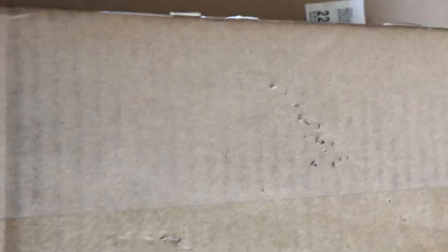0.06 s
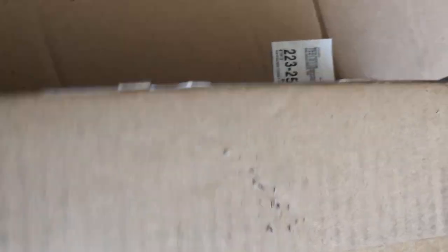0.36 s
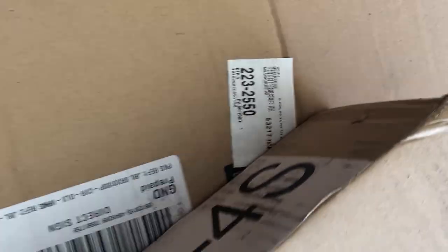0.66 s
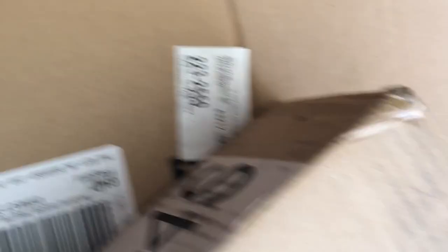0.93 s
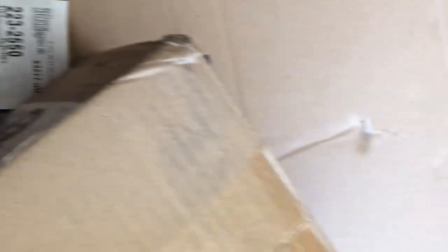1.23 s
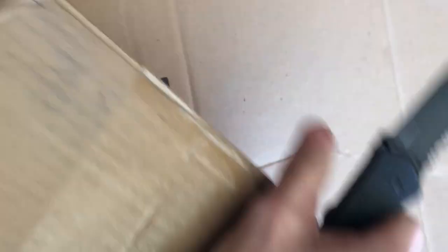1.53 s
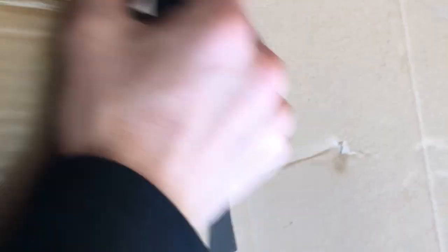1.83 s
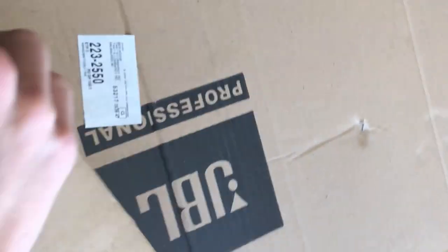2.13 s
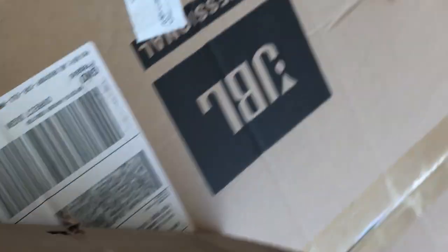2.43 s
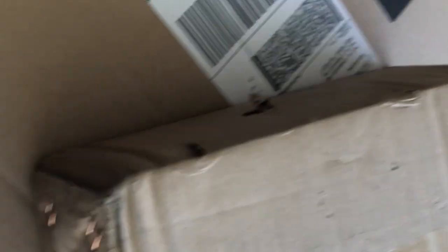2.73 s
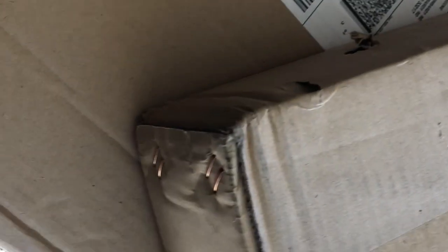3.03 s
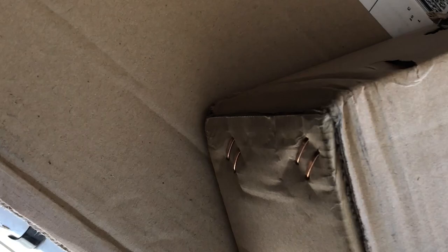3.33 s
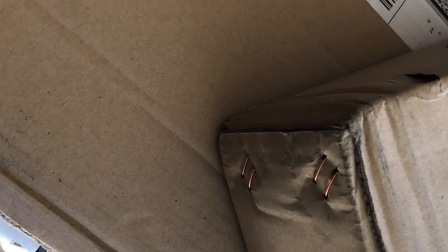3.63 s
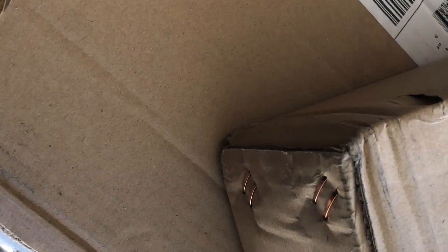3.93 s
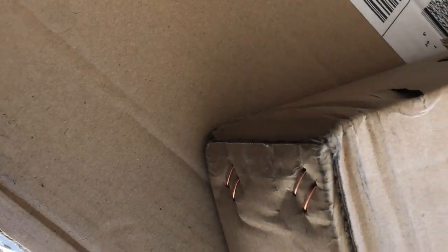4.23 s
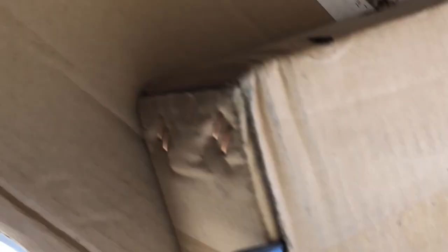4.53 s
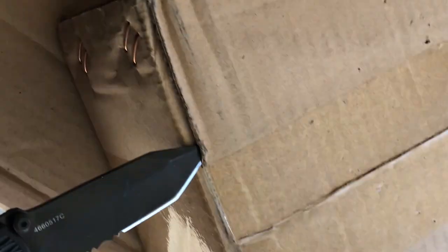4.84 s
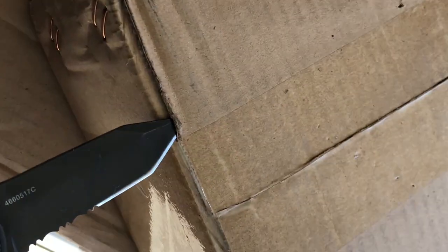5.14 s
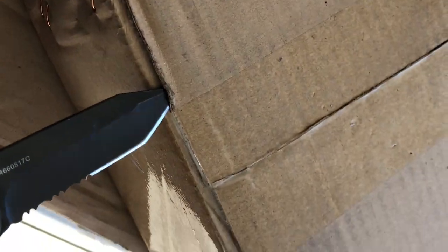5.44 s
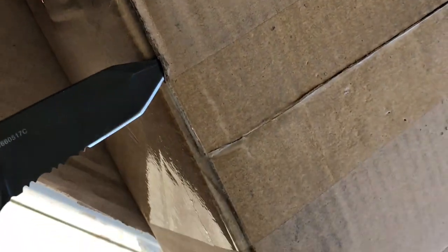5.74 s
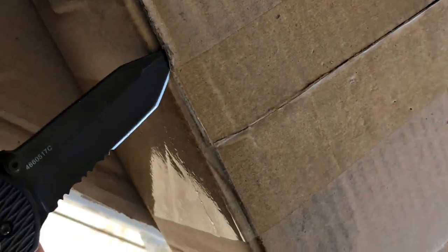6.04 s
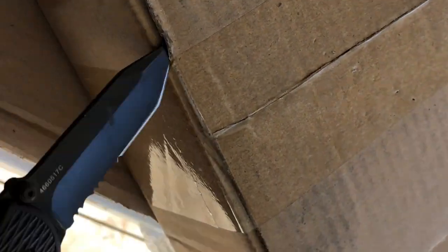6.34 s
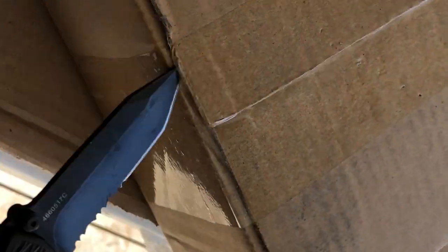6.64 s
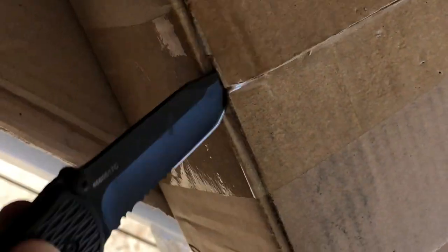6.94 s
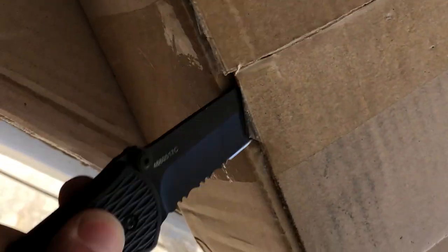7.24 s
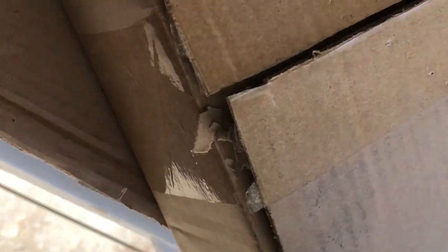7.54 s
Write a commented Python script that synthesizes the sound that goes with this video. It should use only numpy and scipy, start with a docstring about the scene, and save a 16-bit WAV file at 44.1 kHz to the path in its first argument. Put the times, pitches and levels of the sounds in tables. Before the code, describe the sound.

Close by in a small room, a carton slides along the inside of a big cardboard box with a rubbing hiss, hollow bumps and sharp ticks. The drag stops, leaving low room noise and faint birds outside. A knife tip scratches lightly at a taped seam, then tears through it in short rasping strokes with snapping fibres and cardboard thumps.

```python
"""Over low room noise, a carton slides along the wall of a big cardboard box, bumping and ticking.
Friction makes its hiss and rumble; impacts send bending waves through the board and set flaps ringing.
Then a knife tip picks at a taped seam and tears through it in short rasping strokes, with snapping
fibres and thumps of the panel. Faint birds chirp outside. The box is close by, indoors, heard in mono."""
import sys
import numpy as np
from scipy import signal
from scipy.fft import rfft, irfft, next_fast_len
from scipy.io import wavfile
from scipy.ndimage import map_coordinates

SR = 44100
rng = np.random.default_rng(int(sys.argv[2]) if len(sys.argv) > 2 else 0)


def file_out(sig):
    """Save sig as 16-bit WAV at sys.argv[1]."""
    # one column per channel
    cols = np.atleast_2d(sig).T
    # limit, then scale
    lim = np.clip(cols, -1, 1)
    pcm = np.round(lim * 32767).astype(np.int16)
    wavfile.write(sys.argv[1], SR, pcm)


N = 338688

# bumps on the panels: t/s, level/dB, pitch f/Hz
BUMPS = [(.23, -15.5, 488), (0.2537, -17.5, 494), (0.341, -29.5, 770), (0.36, -36, 895), (.47, -29, 266),
         (0.55, -27.5, 137), (0.744, -28, 229), (.857, -25.5, 600), (0.864, -19, 213), (0.964, -11, 280),
         (.988, -21, 700), (1.031, -21, 235), (1.1743, -29, 1070), (1.175, -25.5, 169), (1.19, -28.5, 148),
         (1.412, -22, 910), (1.515, -26.5, 830), (1.517, -21.5, 139.6), (1.621, -24.5, 170),
         (2.675, -36, 401), (2.679, -31.5, 1010), (2.719, -29, 1300), (3.9018, -33, 785),
         (3.902, -20.5, 178), (4.265, -38.5, 306), (4.288, -29.5, 360), (4.315, -32.5, 313),
         (4.78, -38.5, 173), (4.817, -41, 170), (6.382, -31, 1550), (6.537, -22.5, 316),
         (6.587, -22.5, 196), (6.96, -19.5, 304), (6.972, -11.5, 196), (7.181, -33, 180),
         (7.435, -18, 1010), (7.437, -19.5, 180), (7.483, -8.5, 209), (7.484, -18.5, 430),
         (7.503, -26, 170)]
# spectrum of board fibres catching and tearing: f/Hz, relative level/dB
RASP_SPECTRUM = [(250, -40.5), (620, 2), (1100, 0), (1650, 3), (2200, 2), (2800, -6), (4000, -19),
                 (7000, -44)]


def amp(db):
    """Amplitude ratio of a level in decibels."""
    return 10 ** (np.asarray(db) / 20)


def unit(x):
    """Normalisation to rms 1."""
    return x / np.sqrt(np.mean(x ** 2) + 1e-20)


def along(points, hz):
    """Interpolation of (f/Hz, value) points on a logarithmic frequency axis."""
    f, values = np.transpose(points)
    return np.interp(np.log(hz + 1e-6), np.log(f), values)


def curves(rows):
    """Linear interpolation in time: one value per sample for each column after t/s."""
    times, *columns = np.transpose(rows)
    return [np.interp(np.arange(N) / SR, times, column) for column in columns]


def wobble(rate):
    """Smooth random modulation: a spline through rate knots a second."""
    return map_coordinates(rng.standard_normal(int(N * rate / SR) + 4), [np.arange(N) * rate / SR])


def swell(s, rise, fall):
    """Gaussian envelope of a movement that speeds up until time s, then slows."""
    t = np.arange(N) / SR - s
    return np.exp(-(t / np.where(t < 0, rise, fall)) ** 2 / 2)


def press(start, end, rise, fall):
    """Smooth gate of a push that sets in at start, holds, and lets go at end."""
    t = np.arange(N) / SR
    return (1 + np.tanh((t - start) / rise)) / 2 * (1 - np.tanh((t - end) / fall)) / 2


def add(track, s, sound):
    """Superposition of a sound on the track at time s."""
    part = track[max(0, round(s * SR)):][:len(sound)]
    part += sound[:len(part)]


def filtered(x, response):
    """Linear filtering: the spectrum of x times a complex frequency response."""
    size = next_fast_len(len(x) + SR // 4)
    return irfft(rfft(x, size) * response(np.fft.rfftfreq(size, 1 / SR)), size)[:len(x)]


def coloured(x, spectrum):
    """Spectral shaping of x, returned at rms 1."""
    return unit(filtered(x, lambda hz: amp(along(spectrum, hz))))


def minimum_phase(spectrum, scale_hz, size=2048):
    """Minimum-phase impulse response of a spectrum whose frequencies count in units of scale_hz."""
    hz = np.fft.rfftfreq(size, 1 / SR)
    cepstrum = irfft(np.log(amp(along(spectrum, hz / scale_hz))))
    cepstrum[1:size // 2] *= 2
    cepstrum[size // 2 + 1:] = 0
    return irfft(np.exp(rfft(cepstrum)))


def resonance(f, centre_hz, width_hz):
    """Frequency response of a damped oscillator, 1 at its centre."""
    return 1j * f * width_hz / (centre_hz ** 2 - f * f + 1j * f * width_hz)


def bend(x, lag_s=0.00513, lag_hz=200, slope=0.773):
    """Dispersion of bending waves in the board: the treble arrives first, the bass last."""
    def response(hz):
        group_delay = lag_s * (lag_hz / np.maximum(hz, 100)) ** slope
        return np.exp(-2j * np.pi * np.cumsum(group_delay) * hz[1])
    return filtered(x, response)


def echoes(x, decay):
    """Reverberation: diffuse reflections die exponentially, with decay given as (f/Hz, t60/s) points."""
    hz, t, noise = signal.stft(rng.standard_normal(SR // 2), SR, nperseg=256)
    tail = signal.istft(noise * amp(-60 * t / along(decay, hz)[:, None]), SR, nperseg=256)[1]
    return signal.fftconvolve(x, tail / np.linalg.norm(tail))[:N]


def fibres(density, spread_db, clump_rate, clump_db):
    """Shot noise: tiny slips of random size, density a second, whose strength comes in clumps."""
    slips = (rng.random(N) < density / SR) * rng.choice([-1, 1], N)
    size_db = spread_db * np.clip(rng.standard_normal(N), -2, 2)
    return unit(slips * amp(size_db + clump_db * np.tanh(wobble(clump_rate))))


def room_noise():
    """Background noise: broadband, strongest in the bass and nearly steady."""
    # noise spectrum: f/Hz, relative level/dB
    spectrum = [(15, -52), (25, -20.5), (76, 1.5), (102, 0.5), (206, -4.5), (416, -16), (988, -14),
                (1740, -21), (2160, -28), (2760, -31), (3720, -30.5), (5430, -30), (7710, -38.5),
                (14800, -44.5), (16000, -43)]
    # a slight rise of the noise: t/s, level/dB
    trend = [(3.3, -49), (4.3, -48.5)]
    level_db, = curves(trend)
    return amp(level_db + 0.56 * wobble(4.65)) * coloured(rng.standard_normal(N), spectrum)


def carton_moves(sizzle_tilt=1.3):
    """Incoherent movements add in power, giving envelopes of rumble, rub, hiss and sizzle."""
    # short shoves: top speed t/s, rise/s, fall/s, level/dB, brightness/dB, wall rumble/dB
    shoves = [(.09, 0.038, 0.13, -47.5, -0.5, -58), (.485, 0.089, 0.11, -33.5, 2, -45),
              (.62, 0.1, 0.11, -35, 0, -41.5), (0.859, 0.049, 0.11, -37, -0.5, -41),
              (1.158, 0.029, 0.031, -49.5, 7.5, -58)]
    # the long drag, which stops dead: t/s, level/dB, brightness/dB, wall rumble/dB
    drag = [(1.02, -53, 8, -40), (1.27, -37.5, -1.5, -47), (1.45, -34.5, 0, -48), (1.7, -35, 2.5, -46),
            (1.97, -36.5, 1, -46.5), (2.27, -35, 3, -48.5), (2.58, -40.5, 0.5, -55),
            (2.64, -38.5, -2.5, -48), (2.69, -36.5, -4, -45), (2.75, -43.5, 0.5, -52),
            (2.815, -47.5, -3.5, -51), (2.835, -65, -21, -47)]
    t = np.arange(N) / SR
    dragging = (t > drag[0][0]) * (t < drag[-1][0])
    moves = [(dragging, *curves(drag))]
    moves += [(swell(s, rise, fall), *levels) for s, rise, fall, *levels in shoves]
    power = np.zeros((4, N))
    for speed, db, bright_db, rumble_db in moves:
        bands_db = (rumble_db, db - bright_db, db + bright_db, db + sizzle_tilt * bright_db)
        power += [(speed * amp(band_db)) ** 2 for band_db in bands_db]
    return np.sqrt(power)


def slide(pressure_db=1.5, grab_db=1.55, lurch_db=1.0, catch_db=-15):
    """Sliding friction of board on board: dense slips hiss, rough spots catch, and the walls rumble."""
    # shaken walls: f/Hz, relative level/dB
    rumble_spectrum = [(30, -55), (60, 1.5), (120, 1.5), (250, -2.5), (400, -10.5), (700, -55), (1500, -60)]
    # the rough face grabbing and letting go: f/Hz, relative level/dB
    rub_spectrum = [(200, -9), (450, -2), (900, -6), (1250, -1.5), (1750, 3), (2200, -1.6), (2700, -6),
                    (4000, -10), (8000, -35)]
    # dense slips: f/Hz, relative level/dB
    hiss_spectrum = [(1200, -66.5), (2500, -5.5), (3500, 0), (5000, 0), (6800, -0.5), (9000, -4.5),
                     (11000, -15), (15500, -26)]
    # their finest hiss: f/Hz, relative level/dB
    sizzle_spectrum = [(5000, -15.5), (9000, -10), (12000, -1.5), (15500, -4)]
    rumble, rub, hiss, sizzle = carton_moves()
    pressure = amp(pressure_db * wobble(22.41))
    slips = pressure * fibres(density=16000, spread_db=0.5, clump_rate=330, clump_db=1.5)
    low = amp(lurch_db * wobble(12.6)) * rumble * coloured(rng.standard_normal(N), rumble_spectrum)
    grip = amp(grab_db * wobble(29.86))
    grabs = fibres(density=6600, spread_db=1.0, clump_rate=98, clump_db=2.0)
    face = grip * rub * coloured(grabs, rub_spectrum)
    rough_spots = fibres(density=60, spread_db=0.5, clump_rate=4.6, clump_db=-7.0)
    catches = amp(catch_db) * rub * coloured(rough_spots, RASP_SPECTRUM)
    high = amp(-1.0) * hiss * coloured(slips, hiss_spectrum)
    finest = amp(-9) * sizzle * coloured(slips, sizzle_spectrum)
    return low + face + catches + high + finest


def walls(x):
    """Forced vibration: the box adds its hollow resonances to whatever shakes it."""
    # modes of walls and flaps: f/Hz, bandwidth/Hz, gain/dB
    modes = [(149.3, 18, -1.5), (340, 77, -9.5), (610, 90, -12.5), (783, 180, -18.5), (1684, 150, -33)]
    return filtered(x, lambda f: 1 + sum(amp(db) * resonance(f, hz, width) for hz, width, db in modes))


def rings(rise_cycles=0.41, waver=0.041):
    """Damped free vibration of a flap or panel, whose pitch wavers as the board flexes."""
    # flaps and panels struck or let go: t/s, level/dB, f/Hz, t60/s
    swings = [(0.2298, -17, 1730, 0.025), (0.229, -26, 3300, 0.014), (0.254, -21, 1930, .018),
              (.59, -28, 92.6, .22), (.9632, -23, 3730, .016), (0.9668, -5.5, 267, 0.058),
              (0.9696, -16.5, 3300, .014), (.971, -21, 730, 0.038), (1.068, -35, 770, 0.09),
              (1.515, -14.5, 855, 0.023), (1.5152, -12, 1780, 0.01), (1.523, -23, 119, .06),
              (1.619, -19.5, 850, 0.029), (1.69, -32, 82, 0.26), (2.695, -29, 1960, .07),
              (6.723, -23, 131, 0.085), (7.175, -16, 2370, .018), (7.185, -14.5, 166.3, .12),
              (7.194, -27, 1630, 0.13), (7.2, -20.5, 479, 0.063), (7.437, -16, 1590, 0.039),
              (7.431, -21, 150, .1), (7.484, -15, 1670, 0.017), (7.488, -17, 69, 0.14),
              (7.531, -16, 3760, 0.0074)]
    track, t = np.zeros(N), np.arange(SR // 5) / SR
    flex = 1 + waver * wobble(300)
    for s, db, hz, t60 in swings:
        phase = 2 * np.pi * hz * np.cumsum(np.roll(flex, -int(s * SR))[:len(t)]) / SR
        attack = 1 - np.exp(-t * hz / rise_cycles)
        add(track, s, amp(db - 60 * t / t60) * attack * np.sin(phase))
    return track


def snaps(span_s=0.00025, first_break=0.35, usual_t60=0.0069, contact_hz=2650, contact_t60=0.01):
    """Acoustic emission: a snap, or a bump's crack, is one sharp break and a burst of small fractures."""
    # fibres and tape snapping, edges catching: t/s, level/dB, centre f/Hz, t60/s
    breaks = [(.2298, -18, 4500, 0.0043), (.2536, -23, 7000, 0.0076), (1.4069, -5.5, 6270, 0.0087),
              (1.412, -4.5, 6400, 0.012), (1.4193, -11, 6050, 0.0066), (1.436, -13.5, 6000, 0.0059),
              (1.5034, -20, 8500, .003), (1.5152, 0.5, 3520, 0.0094), (1.5465, -7, 5400, 0.0066),
              (1.547, -12.5, 1730, 0.011), (1.618, -12.5, 5000, .012), (1.623, -10, 3870, 0.016),
              (2.68, -15.5, 5500, 0.0064), (2.812, -24, 2180, 0.014), (3.148, -29.5, 5650, 0.012),
              (3.9035, -34.5, 5500, 0.005), (3.941, -34, 13000, 0.0064), (4.207, -37.5, 8000, 0.003),
              (4.259, -41, 8000, .005), (4.27, -42, 8000, .005), (4.288, -29.5, 6900, 0.0031),
              (4.311, -30, 5500, .012), (4.346, -38, 10000, .012), (4.54, -40, 4500, .007),
              (4.546, -46, 9000, .007), (4.788, -38, 3900, .012), (5.143, -42, 7000, .008),
              (5.277, -45, 9000, .007), (5.303, -42, 8500, .003), (5.333, -43, 6000, .005),
              (6.382, -20, 2890, 0.016), (6.559, -12.5, 4700, 0.0089), (6.572, -29, 7000, 0.0072),
              (6.5915, -15, 7700, 0.0047), (6.6258, -22.5, 7600, .004), (6.7207, -7.5, 9200, .0025),
              (6.7678, -19, 6500, .007), (6.771, -9, 6070, 0.0078), (6.802, -16, 8500, 0.0056),
              (6.8125, -17, 2800, 0.0077), (6.819, -27, 7000, 0.0036), (6.869, -39, 7000, .005),
              (6.922, -24, 5500, .012), (6.932, -21, 7500, .006), (6.963, -9, 8800, 0.01),
              (6.97, -2, 9000, 0.007), (6.9744, -7, 9200, 0.0028), (7.024, -3, 5250, 0.0093),
              (7.0437, -3.5, 7740, 0.0033), (7.0452, -7, 8800, .008), (7.0473, -3, 4500, 0.0097),
              (7.0535, -9, 8000, 0.012), (7.1275, -19, 5400, 0.0064), (7.176, -8.5, 3680, 0.0056),
              (7.184, -8.5, 6600, 0.0099), (7.2185, -8.5, 5570, 0.005), (7.261, -9.5, 9000, 0.016),
              (7.278, -12, 4000, .009), (7.287, -9, 3860, 0.01), (7.321, -16, 4300, .012),
              (7.342, -10, 5900, 0.0042), (7.3475, -16, 4000, .007), (7.4215, -15, 8000, .005),
              (7.4329, -11, 7800, 0.012), (7.435, -5.5, 7240, 0.0064), (7.475, -12.5, 4460, 0.0038),
              (7.4825, -14, 4300, 0.011), (7.5313, -13.5, 3620, 0.0078), (7.5992, -11.5, 5800, 0.0062)]
    # a snap of the usual t60: f/centre, relative level/dB
    spectrum = [(.02, -22.5), (.12, -8), (.68, -1.5), (1, 1), (1.3, -2.5), (2.5, -14), (6, -25)]
    track, t = np.zeros(N), np.arange(SR // 30) / SR
    # harder contacts bump higher and crack louder: 3.5 dB per octave, up to a limit
    cracks = [(s, db + min(3.5 * np.log2(hz / 450), -4), contact_hz, contact_t60) for s, db, hz in BUMPS]
    for s, db, hz, t60 in [*breaks, *cracks]:
        fractures = rng.standard_normal(len(t)) * amp(-60 * t / t60)
        fractures /= np.linalg.norm(fractures)
        fractures[int(.0002 * SR)] += first_break * usual_t60 / t60
        # brief snaps are broad clicks; longer ones ring at their centre frequency
        focus = np.sqrt(t60 / usual_t60)
        burst = signal.fftconvolve(fractures, minimum_phase(np.array(spectrum) * [1, focus], hz))
        add(track, s, amp(db) * np.sqrt(span_s * SR) * burst / np.linalg.norm(burst))
    return track


def knocks(echo_db=-10, echo_t60=0.023, span_s=0.0025):
    """An impact disperses into a falling bending-wave chirp, followed by echoes from the panel's edges."""
    # a bump: f/pitch, relative level/dB
    spectrum = [(.1, -21), (.35, -13.5), (.7, -3), (1, 2), (1.5, -7.5), (2.4, -15.5), (3.6, -21),
                (7, -48.5), (14, -47), (40, -99)]
    track, t = np.zeros(N), np.arange(SR // 5) / SR
    for s, db, hz in BUMPS:
        pulse = minimum_phase(spectrum, hz)
        pulse /= np.linalg.norm(pulse)
        edges = rng.standard_normal(len(t)) * amp(-60 * t / echo_t60) * (t > 2 / hz)
        bump = signal.fftconvolve(edges, pulse)
        bump *= amp(echo_db) / np.linalg.norm(bump)
        add(bump, 0, pulse)
        add(track, s, amp(db) * np.sqrt(span_s * SR) * bump)
    return bend(track)


def struck_board(blows):
    """Transmission: the board colours each blow that passes through it."""
    # transfer function: f/(0.94 Hz), gain/dB
    response = [(25, -40), (70, 2.5), (150, 1), (550, 0.5), (800, 2), (1150, -3), (1680, 3), (2100, 1.5),
                (2600, -1), (3300, -4), (4300, -3.5), (6500, 3), (15000, -3.5)]
    return signal.fftconvolve(blows, minimum_phase(response, 0.94))[:N]


def patches(width_octaves=0.5):
    """Roughness noise: each passing patch of board swells in its own band; coarse ones scrape in clumps."""
    # patches under the carton: t/s, half length/s, level/dB, centre f/Hz, graininess/dB
    passes = [(0.37, 0.034, -39, 1700, 13), (0.507, 0.035, -38, 4200, -4), (0.663, 0.041, -34, 3000, 4),
              (.77, 0.026, -49, 3800, 8), (0.755, .04, -46, 1310, 4), (1.152, .035, -36.5, 8900, 3),
              (1.263, 0.044, -43, 9000, -7), (1.624, 0.037, -38, 6040, 6), (1.782, 0.021, -39, 3800, 3),
              (2.32, 0.11, -34.5, 5000, 1.5), (2.427, .025, -39, 1180, 9), (2.52, 0.03, -42, 1520, 6),
              (2.687, 0.03, -43, 900, 9), (2.791, 0.016, -42.5, 10000, 5)]
    track = np.zeros(N)
    for s, half, db, hz, grain_db in passes:
        slips = fibres(density=9000, spread_db=5.0, clump_rate=130, clump_db=grain_db)
        band = filtered(slips, lambda f: np.exp(-(np.log2((f + 1) / hz) / width_octaves) ** 2 / 2))
        track += amp(db) * swell(s, half, half) * unit(band)
    return track


def tear(rise_share=0.36, long_stroke_s=0.051, fall_s=0.0094, panel_fall_s=0.015):
    """Progressive fracture: a stroke splits tape and tears fibres; the same slips shake the panel."""
    # tearing and dragging strokes: start t/s, end t/s, level/dB, tilt from board to tape/dB, panel/dB
    strokes = [(0.988, 1.031, -29.5, 3, -29.5), (1.031, 1.056, -36, 0, -41), (4.285, 4.359, -52, 1, -38),
               (5.979, 6.04, -67, -11, -43.5), (6.347, 6.434, -52.5, -1, -50),
               (6.525, 6.735, -44.5, 0.5, -44), (6.555, 6.58, -29.5, 3, -24),
               (6.716, 6.733, -38, -5.5, -30), (6.767, 6.82, -33.5, 2, -31.5), (6.82, 6.945, -43, 1, -56),
               (6.96, 7.018, -36, 1.5, -45), (7.012, 7.058, -28, 5.5, -28), (7.056, 7.085, -39.5, 10, -36),
               (7.112, 7.138, -39.5, 9, -38), (7.14, 7.175, -44.5, 2, -42), (7.178, 7.225, -31.5, 1, -31),
               (7.258, 7.296, -25.5, 0, -27), (7.297, 7.353, -36.5, 2.5, -34),
               (7.396, 7.43, -36.5, -1, -37), (7.428, 7.489, -32.5, 2, -30), (7.493, 7.524, -47, 5, -41)]
    # splitting tape: f/Hz, relative level/dB
    tape_spectrum = [(1800, -48.5), (3200, -0.5), (4500, 5), (6500, 1), (9500, 2.5), (11000, -4),
                     (15500, -8)]
    # the shaken panel: f/Hz, relative level/dB
    panel_spectrum = [(35, -32), (80, -14.5), (150, -2), (210, -5.5), (300, -6), (420, -11.5), (600, -15.5),
                      (1000, -39), (2500, -71)]
    buried_blade = (6.52, 7.56, -58, 0, -45.5)  # keeps rubbing between strokes
    power = np.zeros((3, N))
    for start, end, db, tilt_db, panel_db in [*strokes, buried_blade]:
        rise = rise_share * min(end - start, long_stroke_s)  # short strokes set in more abruptly
        push = press(start, end, rise, fall_s)
        shake = press(start, end, rise, panel_fall_s)
        power += np.square([amp(db + tilt_db) * push, amp(db - tilt_db) * push, amp(panel_db) * shake])
    tape, board, panel = np.sqrt(power)
    # the blade advances in small uneven jerks, and thicker fibres give way one by one
    fine = fibres(density=9000, spread_db=3.5, clump_rate=520, clump_db=2.5)
    judder = amp(3 * np.tanh(wobble(110)))
    thick = fibres(density=300, spread_db=4.0, clump_rate=79, clump_db=6)
    slips = fine * judder + amp(-6) * thick
    # the tearing fibres pluck the paper liner, which rings on briefly
    liner = filtered(board * slips, lambda f: resonance(f, centre_hz=1645, width_hz=80))
    liner = amp(-11) * np.sqrt(np.mean(board ** 2)) * unit(liner)
    thumps = bend(panel * coloured(slips, panel_spectrum))
    return tape * coloured(slips, tape_spectrum) + board * coloured(slips, RASP_SPECTRUM) + liner + thumps


def pick(shudder_hz=96, shudder_db=-43):
    """Stick-slip friction: the tip scratches along the tape, and slow slips drive the lowest panel mode."""
    # light scuffs of hand and blade tip: start t/s, end t/s, relative level/dB
    scuffs = [(2.84, 3.13, -64.5), (3.217, 3.32, -57.5), (3.33, 3.58, -66), (3.65, 4.15, -71),
              (4.57, 4.91, -67), (4.876, 5.022, -59.5), (5.115, 5.452, -63), (5.62, 5.9, -69.5),
              (5.956, 6.17, -57.5), (6.36, 6.51, -58.5), (7.603, 7.674, -52)]
    # the scratching: f/Hz, relative level/dB
    spectrum = [(500, -5), (1700, 5.5), (2700, 2), (4500, 6.5), (7000, -2.5), (9500, -2), (11500, -8.5),
                (15500, -11.5)]
    power = sum((amp(db) * press(start, end, rise=0.031, fall=0.093)) ** 2 for start, end, db in scuffs)
    scratch = coloured(fibres(density=2600, spread_db=3.5, clump_rate=65, clump_db=4.0), spectrum)
    shudder = amp(shudder_db) * swell(5.36, rise=0.11, fall=0.11)
    mode = unit(filtered(rng.standard_normal(N), lambda hz: np.exp(-((hz - shudder_hz) / 9) ** 2)))
    return amp(5.5) * np.sqrt(power) * scratch + shudder * mode


def chirps(drift=0.01, direct_db=-1.5, echo_db=-6):
    """Frequency modulation makes distant birds' glides hoarse; echoes blur them."""
    # mostly falling calls: t/s, relative level/dB, start f/Hz, end f/Hz, length/s, flutter/pitch
    glides = [(2.887, -52, 4400, 3600, .07, 0.087), (3.01, -51.5, 4450, 2770, 0.11, 0.017),
              (3.26, -52, 3910, 3500, 0.091, 0.064), (3.39, -54, 4500, 4550, .045, .05),
              (3.459, -51, 4820, 3110, .08, 0.092), (3.677, -51, 4600, 3090, 0.062, .035),
              (3.73, -52, 3300, 2850, 0.038, .03), (3.887, -54, 4500, 2990, 0.13, 0.11),
              (3.995, -50.5, 4460, 2980, 0.089, 0.12), (4.195, -52, 3950, 2850, 0.054, 0.025),
              (4.355, -53, 4270, 3110, 0.085, 0.06), (4.915, -58, 4370, 3500, 0.056, .07),
              (4.958, -49, 3650, 3450, .022, .015), (5.014, -53, 3170, 3000, .025, .015),
              (5.367, -49.5, 3500, 3880, 0.025, .02), (5.445, -54, 4880, 3350, 0.052, 0.025),
              (5.842, -50, 3490, 2880, 0.12, 0.073), (6.239, -48, 3440, 3660, 0.024, .03)]
    track = np.zeros(N)
    flutter, wander = wobble(600), drift * wobble(45)
    strength = amp(3 * wobble(70) - 1)
    for s, db, from_hz, to_hz, length, hoarse in glides:
        n = int(length * SR)
        deviation = (hoarse * flutter + wander)[int(s * SR):][:n]
        hz = np.geomspace(from_hz, to_hz, n) * (1 + deviation)
        add(track, s, amp(db) * np.hanning(n) ** .5 * np.sin(2 * np.pi * np.cumsum(hz) / SR))
    calls = strength * track
    return amp(direct_db) * calls + amp(echo_db) * echoes(calls, [(3000, .3), (5000, .25)])


def flock():
    """Diffuse reflection merges the wandering pitches of four farther birds into chatter."""
    # the chatter thins out and returns: t/s, level/dB
    trend = [(3, -60), (4.8, -62), (5.6, -73), (6.3, -60.5)]
    twitter = np.zeros(N)
    for _ in range(4):
        strength = amp(5 * np.tanh(wobble(14)))
        hz = 3900 + 600 * wobble(25) + 130 * wobble(400)
        twitter += strength * np.sin(2 * np.pi * np.cumsum(hz) / SR)
    level_db, = curves(trend)
    return amp(level_db) * unit(echoes(twitter, [(3000, 0.3), (5000, 0.064)]))


def scene():
    """Superposition of the box, its reverberation, birds and room noise, alike in both channels."""
    # reverberation time of the small room: f/Hz, t60/s
    room_decay = [(150, 0.67), (1000, 0.54), (10000, 0.15)]
    blows = struck_board(knocks() + snaps())
    box = walls(slide() + patches() + pick() + tear() + blows + rings())
    mono = box + amp(-17.5) * echoes(box, room_decay) + chirps() + flock() + room_noise()
    return np.array([mono, mono])


def record(dry, low_hz=36, top_hz=15900):
    """Band limiting and saturation: a bass cut, clipping at full scale, then a steep treble cut."""
    bass_cut = signal.butter(2, low_hz, "highpass", fs=SR, output="sos")
    clipped = np.clip(signal.sosfilt(bass_cut, dry), -1, 1)
    return np.array([filtered(channel, lambda hz: 1 / (1 + (hz / top_hz) ** 150)) for channel in clipped])


dry = scene()
out = record(dry)
file_out(out)
```